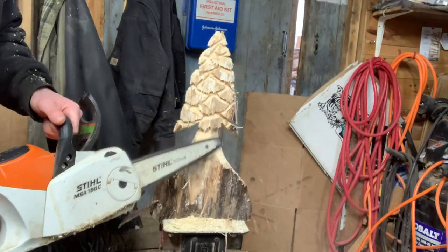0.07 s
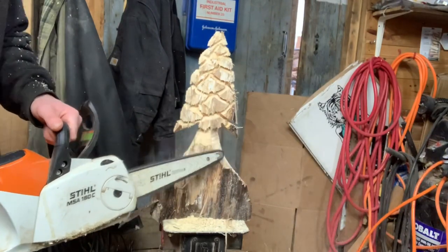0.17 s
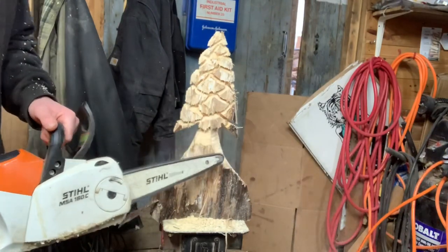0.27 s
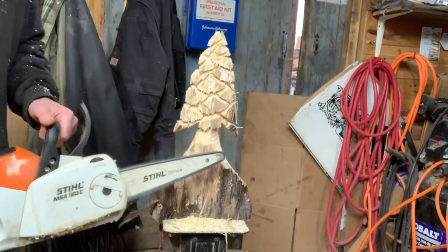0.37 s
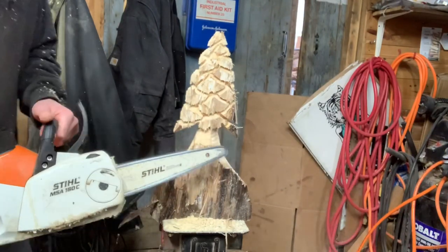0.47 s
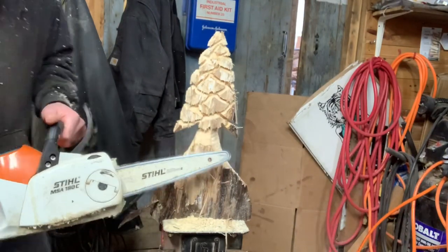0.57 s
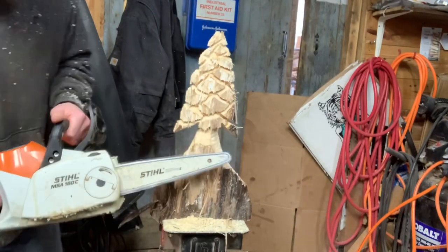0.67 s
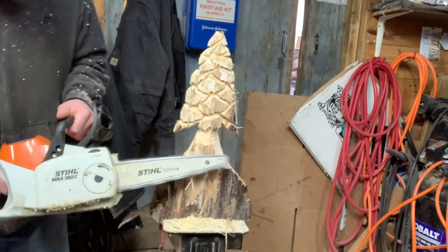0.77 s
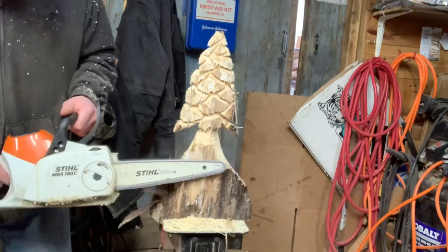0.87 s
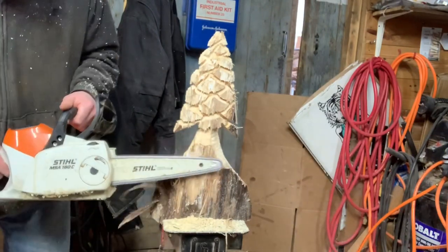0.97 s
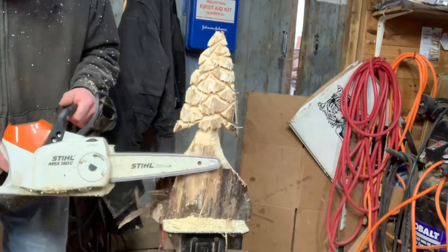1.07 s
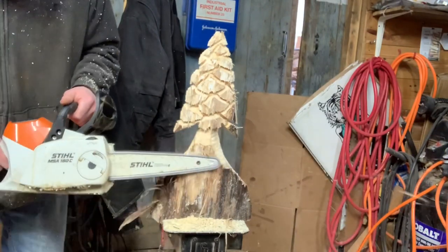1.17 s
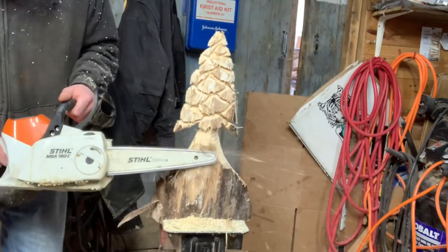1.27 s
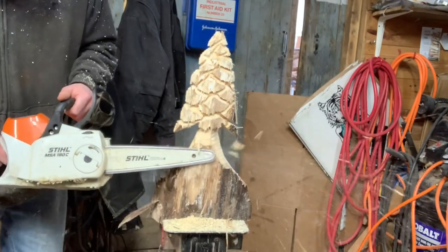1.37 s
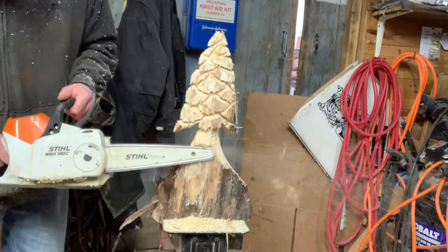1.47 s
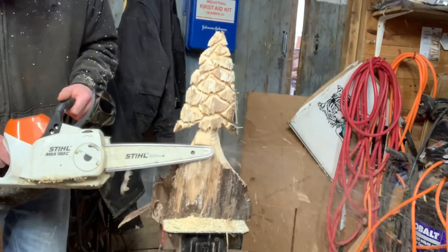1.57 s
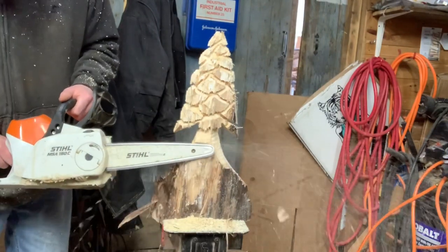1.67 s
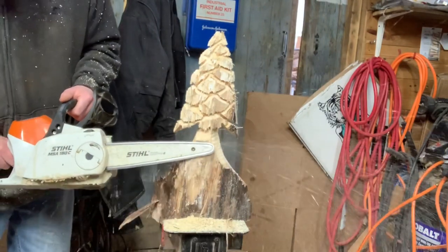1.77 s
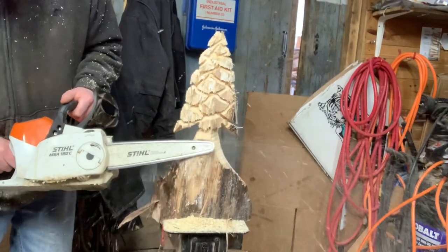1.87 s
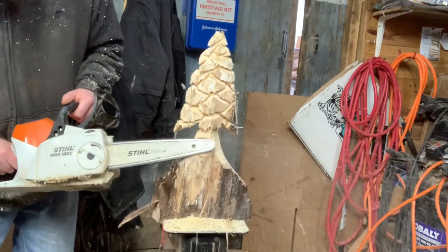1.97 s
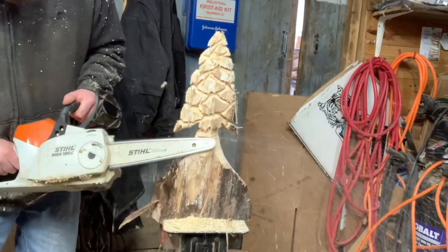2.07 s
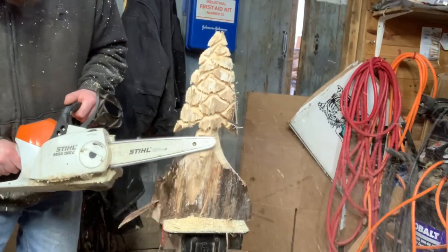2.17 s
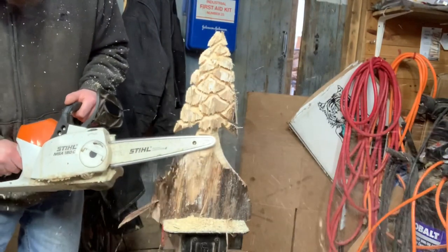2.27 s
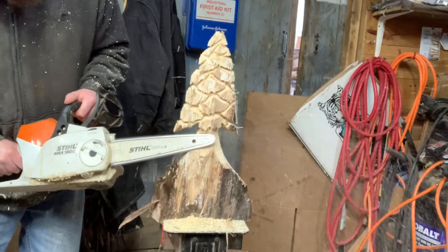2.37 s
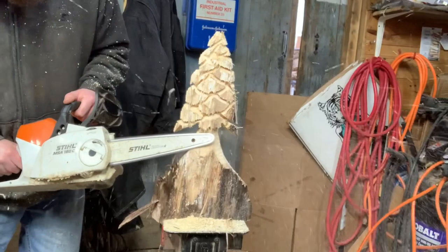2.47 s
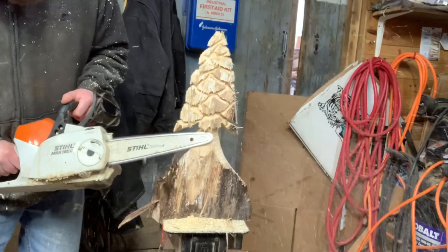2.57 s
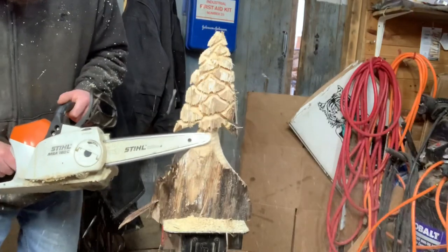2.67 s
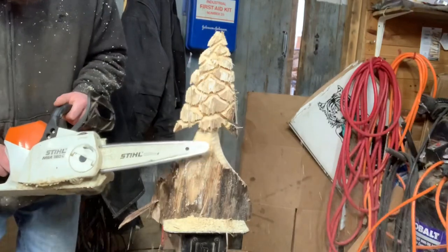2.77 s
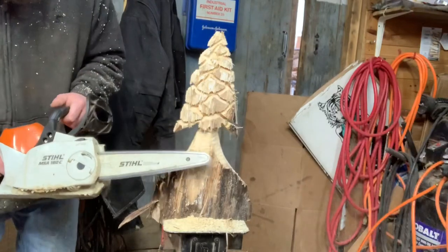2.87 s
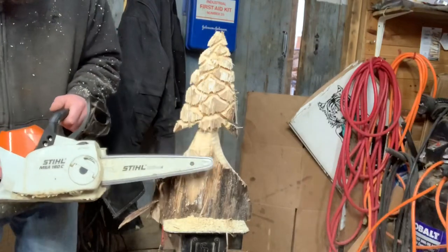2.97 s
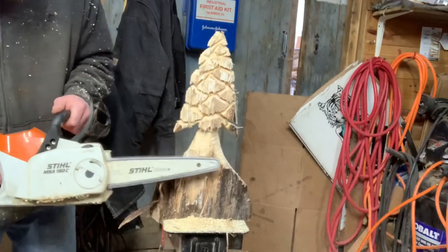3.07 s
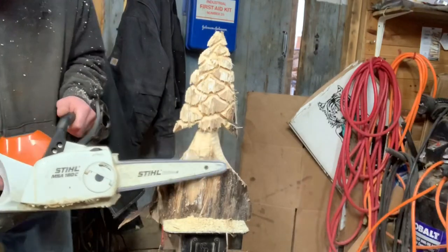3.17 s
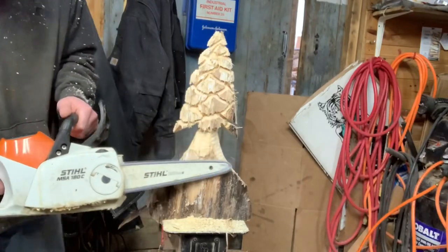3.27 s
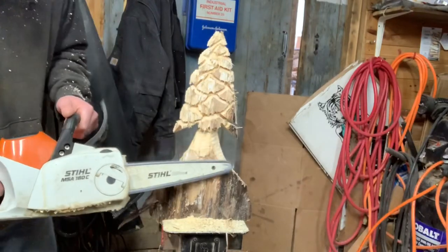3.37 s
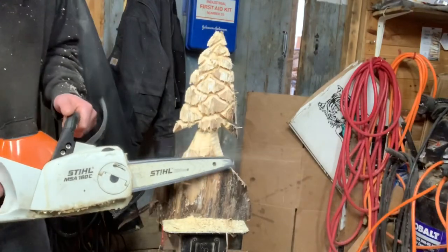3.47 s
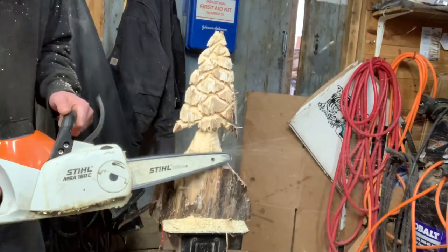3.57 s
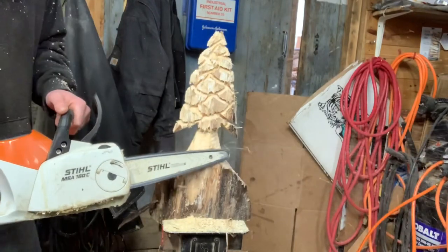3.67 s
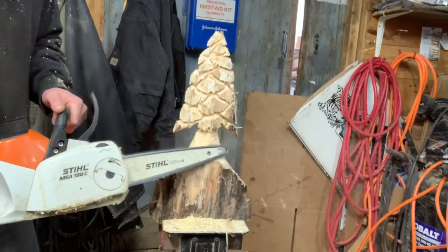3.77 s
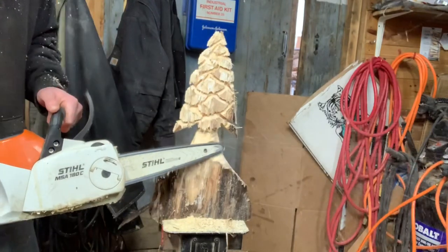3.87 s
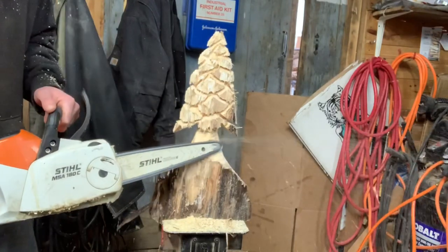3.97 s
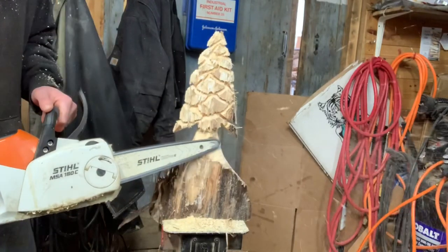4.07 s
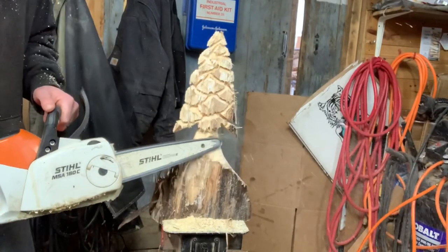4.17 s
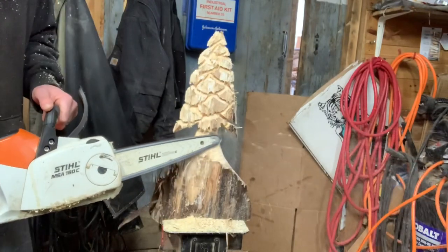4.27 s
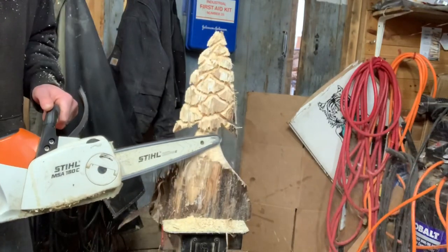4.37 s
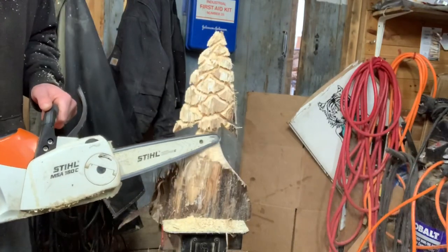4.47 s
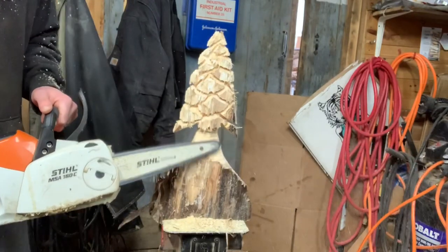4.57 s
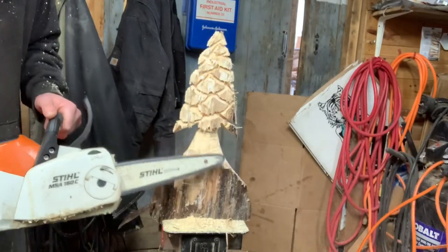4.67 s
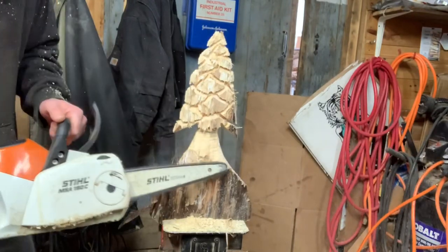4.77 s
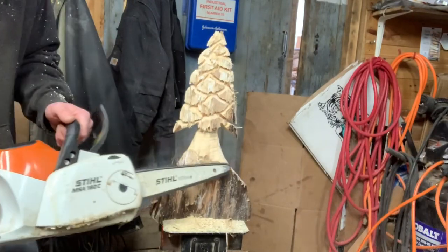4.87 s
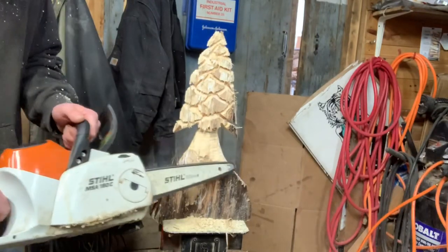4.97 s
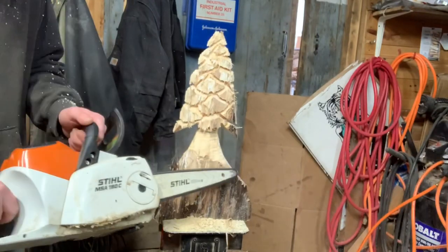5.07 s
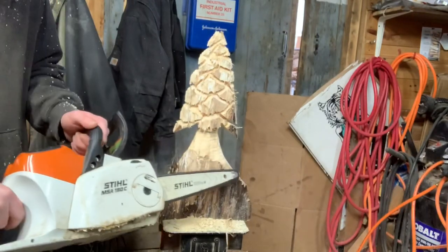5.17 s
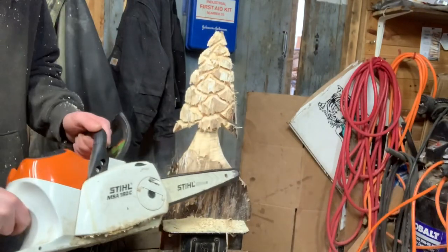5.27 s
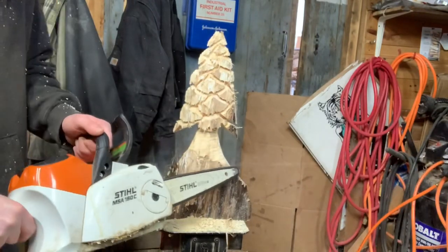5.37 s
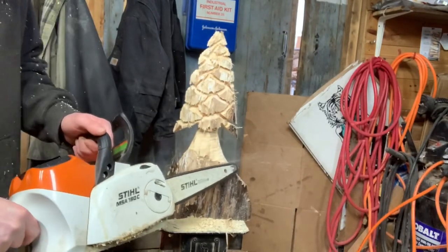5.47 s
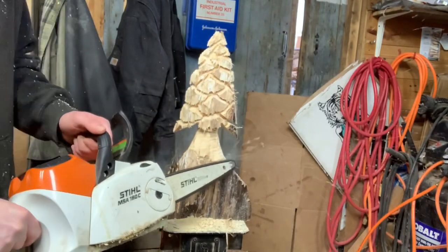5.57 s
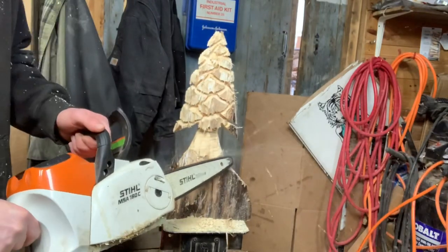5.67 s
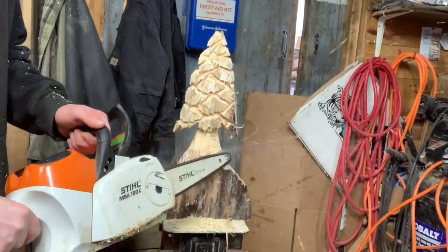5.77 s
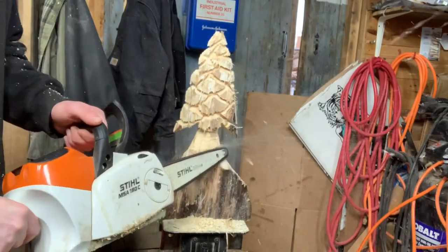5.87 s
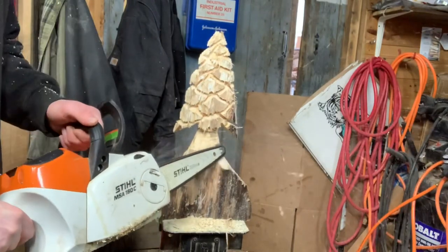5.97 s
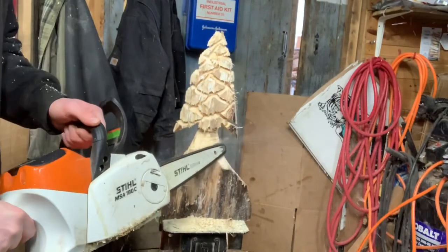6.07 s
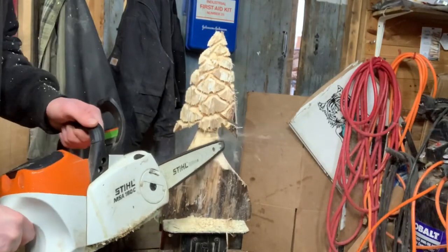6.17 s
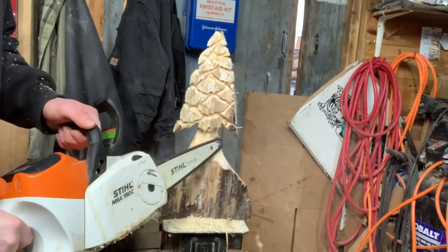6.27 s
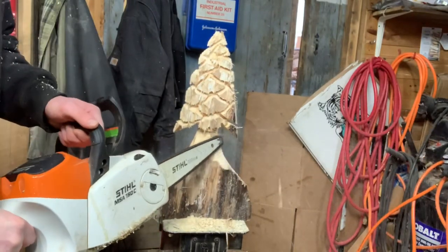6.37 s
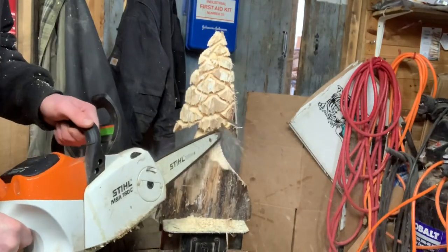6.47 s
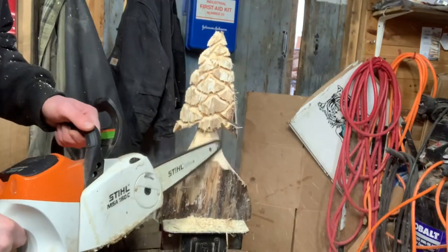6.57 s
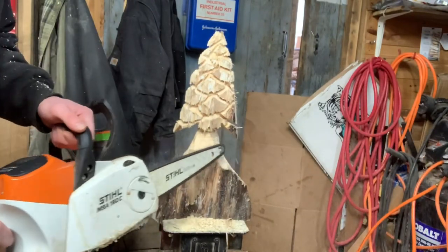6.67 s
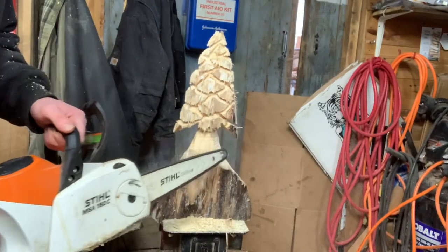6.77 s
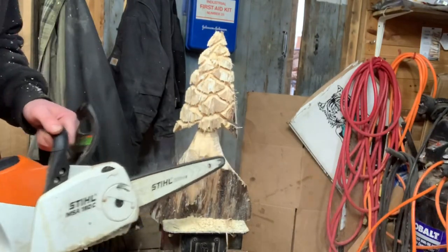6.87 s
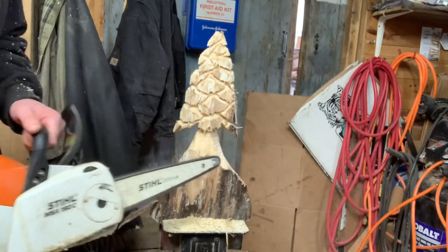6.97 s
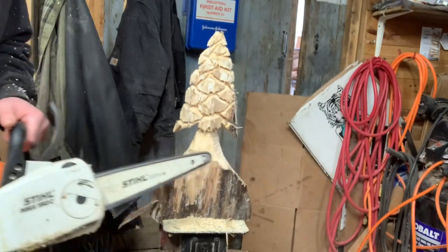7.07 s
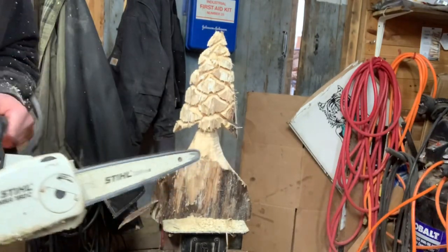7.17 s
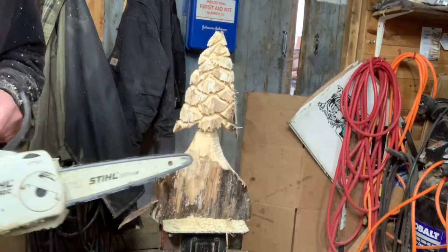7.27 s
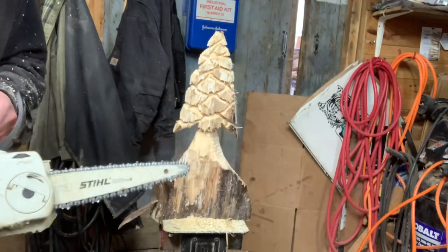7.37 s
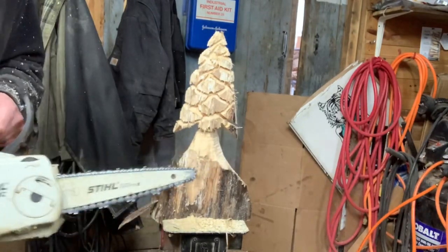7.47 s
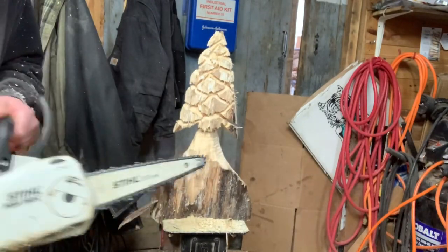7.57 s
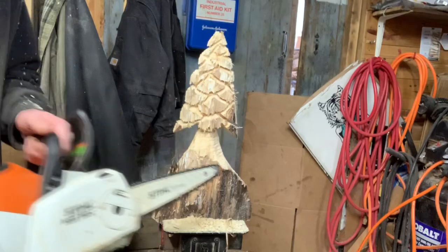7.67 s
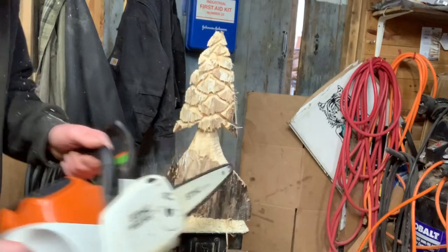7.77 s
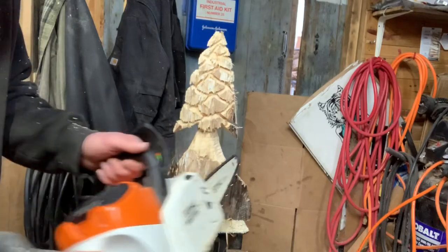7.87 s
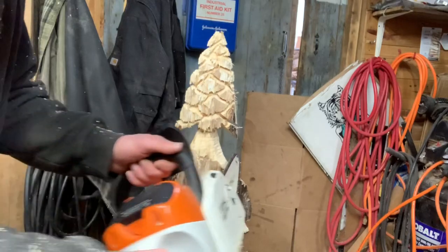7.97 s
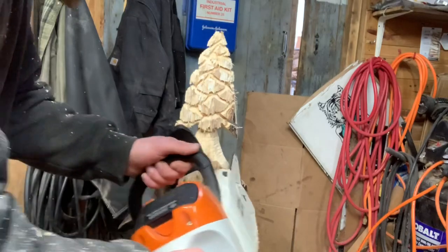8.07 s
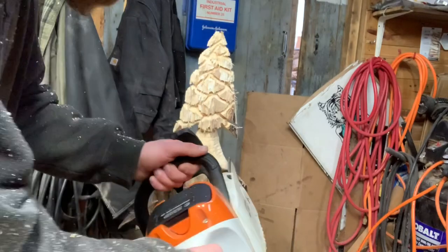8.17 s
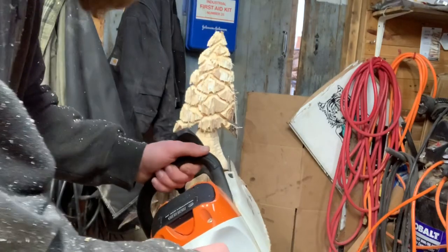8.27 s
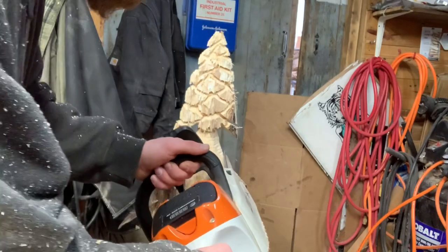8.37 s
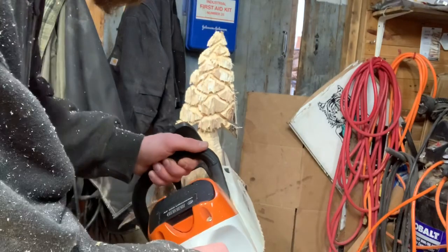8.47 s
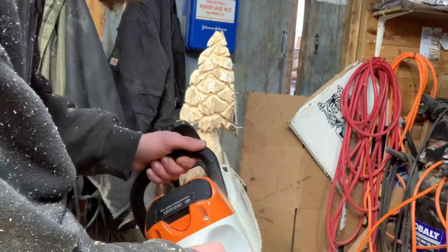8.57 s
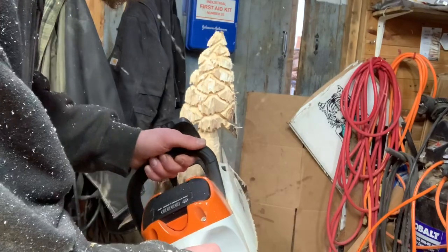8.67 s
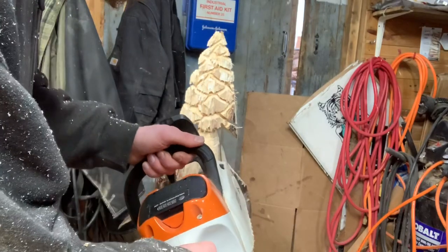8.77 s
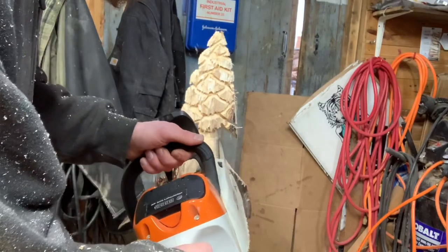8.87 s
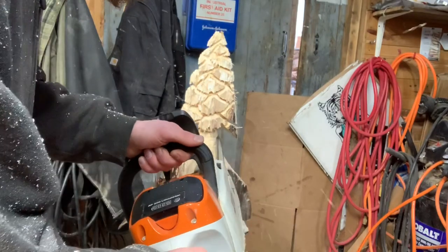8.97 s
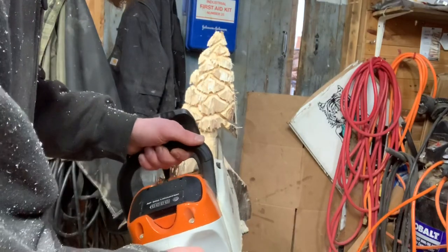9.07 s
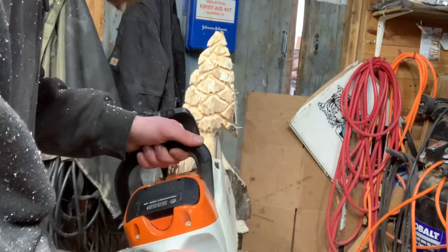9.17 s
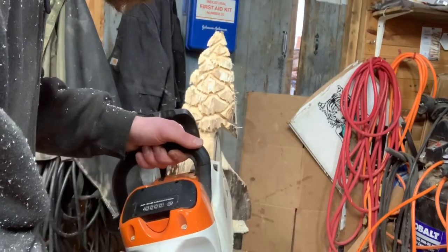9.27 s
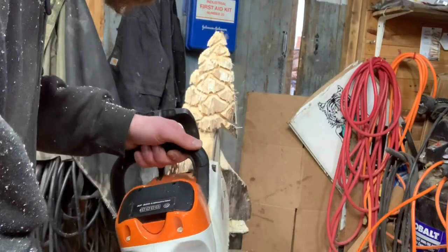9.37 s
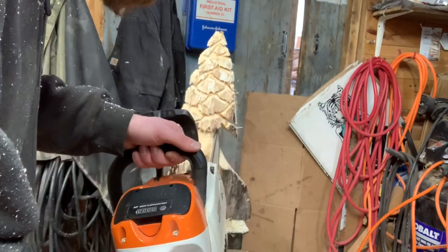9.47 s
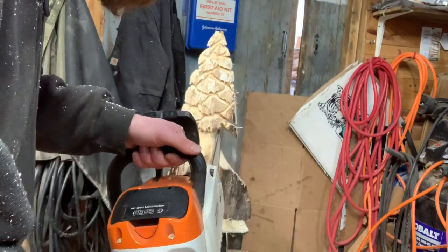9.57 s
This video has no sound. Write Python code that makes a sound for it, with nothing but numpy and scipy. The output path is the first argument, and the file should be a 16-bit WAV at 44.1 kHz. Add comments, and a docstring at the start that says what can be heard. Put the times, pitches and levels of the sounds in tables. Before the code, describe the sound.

Close to the microphone in a small workshop, a battery chainsaw rattles with a harsh bright hiss and steady whine. It slows into a hollow growl, spins back up, then pushes into wood in rough humming surges. It coasts down to quiet with small clicks and knocks, restarts with a rising whine and makes short, hard cuts. The loud sound is clipped and gritty.

```python
"""In a workshop, close to a microphone, a battery chainsaw carves a small wooden tree with its bar tip.
Links strike and ring the housing, scrape as bursts of hiss and make the bar squeal by friction.
Sinusoids locked to link and cutter rates whine and hum; pushes into the wood raise the level.
The saw coasts down, spins up, stops, is turned round and starts again, in a short room tail.
The microphone's input overloads: the waveform is clipped and its top cut."""
import sys
import numpy as np
from scipy import signal
from scipy.fft import rfft, irfft, next_fast_len
from scipy.io import wavfile
from scipy.ndimage import uniform_filter1d, map_coordinates

SR = 44100
rng = np.random.default_rng(int(sys.argv[2]) if len(sys.argv) > 2 else 0)


def unload_wav(signal):
    """Save mono or channel-first audio to the path in sys.argv[1] as 16-bit WAV at rate SR, clipped to [-1, 1]."""
    wavfile.write(
        sys.argv[1],
        SR,
        np.round(np.clip(np.atleast_2d(signal).T, -1, 1) * 32767).astype(np.int16),
    )


N = 423801
TIME = np.arange(N) / SR

# link rate before the load's sag; rest is a faint crawl: t/s, f/Hz
LINK_RATE = [(0, 1000), (.09, 985), (.2, 862), (.28, 758), (.44, 435), (.49, 365), (.57, 225), (.65, 365),
             (.8, 700), (.9, 875), (.99, 1011), (6.68, 1008), (6.8, 912), (6.9, 775), (7.08, 430),
             (7.125, 360), (7.235, 200), (7.285, 20), (7.938, 20), (7.972, 200), (8.19, 355), (8.29, 455),
             (8.34, 610), (8.44, 690), (8.53, 860), (8.62, 1016), (8.75, 1009)]
# pushes of the bar tip into the wood: start t/s, end t/s, force/0-1,
# tearing level/dB before the speed law and final trim, rise of link whine/dB
PUSHES = [(-.1, 0.201, 0.32, -70, -17), (.94, 1.074, 0.12, -70, 1.5), (1.081, 1.565, 0.54, -50.5, 7),
          (1.569, 1.992, 0.61, -43.5, 6), (2.019, 2.562, 0.51, -58, 2.5), (3.171, 3.451, 0.36, -63, 0.5),
          (3.449, 3.821, 0.83, -40.5, 4), (3.856, 4.019, 0.93, -36, 2.5), (4.095, 4.238, 1, -35, 1.5),
          (4.287, 4.492, 0.54, -66, 5), (4.548, 4.821, 0.16, -70, 6.5), (4.862, 5.419, 0.26, -68, 2.5),
          (5.44, 5.788, 0.74, -42.5, 6.5), (5.796, 5.987, 0.83, -36, 4.5), (6.041, 6.203, .8, -32, 8),
          (6.277, 6.49, 0.72, -36, 3), (6.541, 6.88, 0.16, -73, -9), (8.53, 8.71, 0.57, -40, 8),
          (8.74, 8.937, 0.8, -32, 11.5), (9.029, 9.18, 0.63, -32.5, 11), (9.276, 9.417, 0.76, -34, 3)]
PUSH_EASE_S = 0.1  # time to lean in and to let go
SAG_HZ = 17  # mean link rate lost at full force
CRAWL_HZ = 203  # below this link rate the chain fades towards silence
# level laws, rows from the side and from behind: level free at full speed/dB,
# rise at full force/dB, loss per halving of speed/dB
CLATTER_LAW = [(-32.5, 7.5, 3), (-29.5, 7.5, 6)]
HISS_LAW = [(-21.5, 6.56, 7), (-24, 6.1, 9.8)]
# how far the bar tip is raised: t/s, share/0-1
TIP_RAISED = [(0, 1), (.4, 0.9), (.8, 0), (2.9, 0.01), (3.4, 0.99), (5.2, 0.83), (5.9, 0.51), (6.6, 0.83)]
TURN_S = 7.7  # the saw is heard from the side before, from behind after

# broad spectrum of the clatter: f/Hz, level/dB
CLATTER_SPECTRUM = [(30, -40), (140, -29.5), (220, -9), (330, -3.5), (550, -3), (800, -4.5), (1100, 0.5),
                    (1600, 0), (2050, -5.5), (2350, -9.5), (2800, -4), (3600, -42.5), (6000, -36)]
# housing resonances from the side and from behind: f/Hz, width/Hz, level/dB
HOUSING_SIDE_MODES = [(752, 115, -0.5), (1559, 61, -0.5), (1720, 190, 1), (1840, 100, -8.5)]
HOUSING_REAR_MODES = [(253, 37, -2), (325, 70, -2.5), (400, 97, 2), (658, 80, -.5), (845, 45, 1.5),
                      (1030, 100, -2), (1350, 110, 5), (1425, 70, 9.5), (1505, 60, 0), (1845, 68, 3.5)]
LOOP_LINKS = 64  # drive links in one loop of chain
# spells of the ringing sprocket cover: start t/s, end t/s, level over the clatter/dB
COVER_SPELLS = [(-.1, .16, -4), (3.15, 4.5, -11), (4.55, 4.95, -4), (6.93, 7.12, -3.5)]
COVER_EASE_S = 0.11
# resonances of the cover: f/Hz, width/Hz, level/dB
COVER_MODES = [(1548, 70, -0.5), (1667, 83, 1), (1755, 68, -3), (1887, 80, -3), (2007, 60, -3.5)]
# spells of the housing's hollow note: start t/s, end t/s,
# level over the clatter/dB, before tip height and speed act
HOLLOW_SPELLS = [(.4, .78, -21), (.79, 2.6, -11.5), (2.58, 3.14, -18), (3.5, 4.6, -13.5)]
# fade; rise with the tip fully up; gain per halving of speed
HOLLOW_EASE_S, HOLLOW_RAISED_DB, HOLLOW_SLOWING_DB = 0.11, 2.5, 8.5
# resonances of the hollow note: f/Hz, width/Hz, level/dB
HOLLOW_MODES = [(368, 28, 0), (758, 110, -7)]

# spectra of the hiss, bar level, tip up and bar pointing away: f/Hz, level/dB
HISS_LEVEL_SPECTRUM = [(2000, -21.5), (3000, -12.5), (4800, -11), (5450, -4.5), (5800, -9), (6300, -0.5),
                       (6750, -6), (7500, -1.5), (8800, 2), (10000, 0), (11400, -0.5), (13000, -2.5),
                       (14500, -10.5), (15800, -8.5)]
HISS_RAISED_SPECTRUM = [(2000, -15.5), (3000, -9), (4900, -9.5), (5600, -5.5), (6900, -5), (7500, 0),
                        (8600, 0), (9100, 1.5), (10000, 1.5), (11400, 1.5), (12300, 0.5), (13300, 2),
                        (14100, -4.5), (15800, -10)]
HISS_AWAY_SPECTRUM = [(2000, -35), (2800, -11), (5200, -7), (6150, -2.5), (6900, -3.5), (8000, -1),
                      (8500, 1), (9400, 3.5), (11000, -1.5), (12000, 0), (13500, -4.5), (15800, -12)]

# spells of rubbing in the bar groove: start t/s, end t/s,
# level/dB before pressure, speed and flutter act
SQUEAL_SPELLS = [(-.2, .36, -18), (4.71, 7.25, -20)]
# fade; loss per halving of speed; rise at full side pressure
SQUEAL_EASE_S, SQUEAL_SLOWING_DB, SQUEAL_PRESS_DB = 0.27, 10, 3.5
# side pressure on the bar: t/s, share/0-1
SIDE_PRESSURE = [(5.1, 0), (5.55, 0.59), (5.9, 1), (6.5, 1), (6.8, 0.3), (7, 0.02)]
# bar resonances, free and pressed sideways: f/Hz, width/Hz, level/dB
BAR_FREE_MODES = [(9300, 290, 5), (9910, 360, 2.5), (10900, 380, -15.5)]
BAR_PRESSED_MODES = [(8850, 460, -1), (9290, 400, -0.53), (10110, 240, -1.4), (10640, 290, -0.88)]

MESH_DB = -40.5  # link whine, running free at full speed, before its partials' levels
# partials of the links: multiple of the link rate, level/dB
LINK_PARTIALS = [(1, -1.5), (2, -4.5), (3, -12)]
# turning of the seven-tooth sprocket: multiple of the link rate, level/dB
SPROCKET_PARTIALS = [(1 / 7, -54.5), (2 / 7, -51), (9 / 7, -48)]
# spells of whistling third link partial: start t/s, end t/s, level at full speed/dB
WHISTLE_SPELLS = [(2.76, 3.08, -44)]
WHISTLE_EASE_S = 0.15

# background of the quiet workshop, relative: f/Hz, level/dB
WORKSHOP_SPECTRUM = [(25, 11), (60, -8.5), (110, -9), (200, -20), (360, -19.5), (700, -26.5), (1600, -30),
                     (3000, -39), (9000, -36), (16000, -48.5)]

# run-downs and run-ups: start t/s, end t/s, low growl level/dB, high whistle level/dB
GLIDES = [(.19, .31, -2, 3.5), (.41, .54, 2, -3), (.62, .79, 1, -1), (.86, .96, -5, -2),
          (6.8, 7.03, -2, -1.5), (7.03, 7.2, 1.5, -1.5), (8.24, 8.56, 0, -9)]
GLIDE_EASE_S = .06
# partials of a chain changing speed: multiple of the link rate, level/dB
GLIDE_PARTIALS = [(1 / 2, -10), (1, 0), (2, -1), (3, -6), (4, -11)]
# low and high resonances swept through: f/Hz, level/dB
GLIDE_LOW_RESPONSE = [(180, -35), (270, -13), (330, -10), (368, 3), (400, -4), (440, -4), (490, -17),
                      (680, -16), (755, -6), (820, -22), (1300, -40)]
GLIDE_HIGH_RESPONSE = [(1000, -45), (1440, -10), (1540, 2), (1620, -1), (1730, 3), (1850, -7), (2100, -20),
                       (3000, -45)]

# spectrum of the wood as the cutters tear at it: f/Hz, level/dB
WOOD_SPECTRUM = [(50, -15), (110, -12), (300, -3), (550, 0.5), (850, -5.5), (1500, -6), (3000, -22.5)]
# cutter partials, left-right pair, single cutter, the pair's third: multiple of the link rate
CUTTER_PARTIALS = [1 / 4, 1 / 2, 3 / 4]
# cutters dig in and hum, before flutter and the speed law: start t/s, end t/s,
# pair level/dB, single cutter level/dB, third level/dB
BITES = [(1.08, 1.5, -51, -50, -44), (1.58, 2.0, -49, -45, -46), (2.05, 2.5, -54, -57, -48),
         (3.58, 3.84, -56, -40.5, -47), (3.85, 4.02, -56, -35.5, -38), (4.11, 4.27, -52, -36, -36.5),
         (5.55, 5.76, -56, -43, -51), (5.76, 5.95, -53, -38, -48), (6.02, 6.2, -52, -38, -48),
         (6.29, 6.48, -53, -34.5, -50), (8.63, 8.76, -39, -39, -44), (8.76, 8.93, -43, -27.5, -40),
         (9.04, 9.175, -44, -27.5, -39), (9.29, 9.415, -50, -30.5, -43)]
BITE_EASE_S = .06

# last rustle of the chain: start t/s, end t/s, level/dB
SETTLING_SPELLS = [(7.25, 7.57, -73.5)]
SETTLING_EASE_S = 0.13
# resonances rung by the rustle: f/Hz, width/Hz, level/dB
SETTLING_MODES = [(355, 70, 6), (750, 300, -6), (1500, 400, -12), (1980, 160, -10), (5200, 500, -9.5),
                  (8300, 1100, -12), (11500, 900, -18)]
# chain ticks, grip knocks and the jerk of take-up: t/s, onset level/dB,
# time to fall 60 dB/s, centre f/Hz, width/Hz
HANDLING_KNOCKS = [(7.271, -60, 0.16, 1197, 2483), (7.325, -66, 0.035, 8020, 3980),
                   (7.477, -69, .025, 6000, 7000), (7.503, -70, .025, 10000, 6000),
                   (7.615, -73, 0.25, 1400, 3490), (7.62, -76, .25, 8000, 8000),
                   (7.677, -56, 0.15, 220, 600), (7.698, -57, .09, 300, 600), (7.78, -73, .015, 5010, 6000),
                   (7.787, -65, 0.027, 2000, 4500), (7.958, -51, 0.06, 1198, 1498),
                   (7.967, -52, .05, 9000, 8000)]
# motor windings as the current comes on: f/Hz, width/Hz, level/dB
MOTOR_MODES = [(1695, 430, 5), (2987, 177, -13), (4260, 140, -11), (6700, 120, 0)]
MOTOR_ON_S = 7.935

TOP_HZ = 15750  # upper limit of the recorded band


def undb(db):
    """Logarithmic level: decibels to amplitude gain."""
    return 10 ** (np.asarray(db) / 20)


def unit(x):
    """Power normalisation: scale to rms 1."""
    return x / np.sqrt(np.mean(x ** 2))


def curves(table):
    """Linear interpolation: the columns of a table against time."""
    s, *columns = np.transpose(table)
    return [np.interp(TIME, s, column) for column in columns]


def filtered(x, response):
    """Linear filtering: multiply the spectrum by a response given over frequency, at rms 1."""
    size = next_fast_len(N + SR // 2, True)
    f = np.maximum(np.fft.rfftfreq(size, 1 / SR), 1)
    return unit(irfft(rfft(x, size) * response(f), size)[:N])


def colour(x, points):
    """Spectral shaping: a gain in dB drawn over log frequency."""
    hz, db = np.transpose(points)
    return filtered(x, lambda f: undb(np.interp(np.log(f), np.log(hz), db)))


def ring(x, modes):
    """Modal superposition: damped resonators driven in parallel."""
    def response(f):
        return sum(undb(db) / (1 + 1j * (f * f - hz * hz) / (f * width)) for hz, width, db in modes)
    return filtered(x, response)


def noise():
    """White noise: equal power at every frequency."""
    return rng.standard_normal(N)


def walk(rate):
    """Random modulation: smoothed steps drawn about `rate` times a second, at rms 1."""
    k = max(int(SR / rate), 2)
    steps = np.repeat(rng.standard_normal(N // k + 1), k)[:N]
    return unit(uniform_filter1d(steps, k))


def blend(a, b, share):
    """Power conservation: cross from one sound to another."""
    share = np.clip(share, 0, 1)
    return np.sqrt(1 - share) * a + np.sqrt(share) * b


def held(start_s, end_s, ease_s):
    """Gating envelope: sinusoidal rise centred on the start, hold at 1, fall centred on the end."""
    inside = np.minimum(TIME - start_s, end_s - TIME)
    return .5 + .5 * np.sin(np.pi * np.clip(inside / ease_s, -.5, .5))


def spells(table, ease_s):
    """Superposed gating: gain of a sound that comes and goes in held spells."""
    return sum(undb(db) * held(start, end, ease_s) for start, end, db in table)


def burst(start_s, decay_s):
    """Exponential decay: a sudden start that falls 60 dB in the decay time."""
    age = TIME - start_s
    return (age >= 0) * np.exp(-np.log(1000) * np.abs(age) / decay_s)


def slowing(hz):
    """Octave measure: halvings of the chain's speed below its maximum."""
    return np.log2(hz.max() / hz)


def drifting(x, share, rate):
    """Doppler-like resampling: an uneven time base lets resonances wander by a share of their pitch."""
    place = np.cumsum(1 + share * walk(rate))
    return map_coordinates(x, [place], order=3, mode="mirror")


def partials(links, orders):
    """Phase locking: sinusoids whose phase follows the travel of the chain."""
    return sum(np.sqrt(2) * undb(db) * np.sin(2 * np.pi * (k * links + rng.random())) for k, db in orders)


def impacts(links, hz, scatter_db, slow_scatter_db, decay_s):
    """Impulsive excitation: each link strikes with random force and decays; scatter varies with speed."""
    chance = rng.standard_normal(N // 20)[links.astype(int)]
    spread_db = scatter_db + slow_scatter_db * np.clip(1 - hz / hz.max(), 0, 1)
    age_s = (links % 1) / hz
    blows = undb(spread_db * chance) * np.exp(-age_s / decay_s)
    # hold the local power even
    return blows / np.sqrt(uniform_filter1d(blows ** 2, size=5000) + 1e-9)


def pushing():
    """Loading: each push gives force on the chain, bite of the cutters and a rise of the link whine."""
    force, bite, mesh_db = 0, 0, MESH_DB
    for start, end, strength, bite_db, rise_db in PUSHES:
        lean = held(start, end, PUSH_EASE_S)
        force = force + strength * lean
        bite = bite + undb(bite_db) * lean
        mesh_db = mesh_db + rise_db * lean
    return force, bite, mesh_db


def chain_rate(force):
    """Motor loading: the link rate sags in proportion to force and flutters at random."""
    asked, = curves(LINK_RATE)
    sag = SAG_HZ * force * (1 + .3 * walk(9))
    return np.maximum(asked - sag, 1) * (1 + 0.000983 * walk(15))


def loudness(law, force, hz):
    """Power-law radiation: level in dB rises with force and speed and fades at a crawl."""
    side, rear = (free_db + force_db * force - slow_db * slowing(hz) for free_db, force_db, slow_db in law)
    return np.where(TIME > TURN_S, rear, side) + 40 * np.log10(np.minimum(hz / CRAWL_HZ, 1))


def looped(links, repeat):
    """Periodicity: worn links return on every loop, so a share of the rattle repeats with the chain."""
    pairs = rng.standard_normal((LOOP_LINKS // 2, 32))
    # wear is how each pair of links departs from the average pair
    marks = (pairs - pairs.mean(axis=0)).ravel()
    places = np.linspace(0, LOOP_LINKS, len(marks), endpoint=False)
    worn = np.interp(links % LOOP_LINKS, places, marks)
    band = [(3000, 2.5), (7000, -6.0)]
    return blend(colour(noise(), band), colour(worn, band), repeat)


def cover(blows):
    """Forced resonance: in spells the chain slaps the sprocket cover, which rings in narrow notes."""
    slaps = blows * noise() * undb(2.7 * walk(45))
    return ring(ring(slaps, COVER_MODES), COVER_MODES) * spells(COVER_SPELLS, COVER_EASE_S)


def clatter(links, hz, clatter_db):
    """Impact excitation: links knock on sprocket and bar nose and ring the plastic housing."""
    blows = impacts(links, hz, scatter_db=2.5, slow_scatter_db=-2.0, decay_s=0.0015)
    blows = blows * undb(1.5 * np.tanh(walk(70)))
    knocks = blows * looped(links, repeat=0.22)
    rings = blows * looped(links, repeat=0.32)
    side_housing = ring(rings, HOUSING_SIDE_MODES)
    rear_housing = drifting(ring(rings, HOUSING_REAR_MODES), share=.012, rate=14)
    side = colour(knocks, CLATTER_SPECTRUM) + undb(-0.5) * side_housing
    rear = colour(knocks, CLATTER_SPECTRUM) + undb(3.0) * rear_housing
    body = blend(unit(side), unit(rear), TIME > TURN_S)
    return (body + hollow(hz) + cover(blows)) * undb(clatter_db)


def softened(x, hz):
    """Low-pass behaviour: a slow chain knocks more softly and loses the top of its clatter."""
    dull = signal.sosfiltfilt(signal.butter(6, 2150, fs=SR, output="sos"), x)
    return dull + (x - dull) * (hz / hz.max()) ** 0.52


def hiss(links, hz):
    """Sliding friction: steel scrapes on steel at every link; the spectrum turns with the bar."""
    scrape = impacts(links, hz, scatter_db=1.5, slow_scatter_db=-0.5, decay_s=0.0047)
    scrape = scrape * undb(.5 * walk(40))
    raised, = curves(TIP_RAISED)
    level_bar = colour(scrape * noise(), HISS_LEVEL_SPECTRUM)
    raised_bar = colour(scrape * noise(), HISS_RAISED_SPECTRUM)
    away = colour(scrape * noise(), HISS_AWAY_SPECTRUM)
    return blend(blend(level_bar, raised_bar, raised), away, TIME > TURN_S)


def glance(x, lag_s, sway, share):
    """Comb interference: a near reflection off the wood, its delay shifting as the hands move."""
    lag = lag_s * (1 + sway * walk(1.5))
    fine = signal.resample_poly(x, 4, 1)  # finer grid for the moving delay
    fine_time = np.linspace(0, N / SR, len(fine), endpoint=False)
    return unit(x + share * np.interp(TIME - lag, fine_time, fine))


def squeal(hz):
    """Friction-driven resonance: the groove rings the bar; side pressure strengthens and shifts it."""
    press, = curves(SIDE_PRESSURE)
    bar = blend(ring(noise(), BAR_FREE_MODES), ring(noise(), BAR_PRESSED_MODES), press)
    wandering = drifting(bar, share=.007, rate=5)
    radiated = colour(wandering, [(4000, -25.0), (8500, 2.0), (11200, 9.0), (15000, -20.5)])
    effort_db = SQUEAL_PRESS_DB * press - SQUEAL_SLOWING_DB * slowing(hz)
    return radiated * spells(SQUEAL_SPELLS, SQUEAL_EASE_S) * undb(effort_db + 0.88 * walk(90))


def whine(links, hz, mesh_db):
    """Harmonic meshing: link and sprocket partials, and a whistling third, fade as the chain slows."""
    mesh = partials(links + .02 * walk(60), LINK_PARTIALS) * undb(mesh_db + 2 * walk(25))
    whistle = partials(links, [(3, 0)]) * spells(WHISTLE_SPELLS, WHISTLE_EASE_S)
    turn = partials(links + 0.16 * walk(12), SPROCKET_PARTIALS) * undb(2.3 * walk(6.9))
    return (mesh + whistle + turn) * (hz / hz.max()) ** 7


def workshop(x, t60_s, wet_db):
    """Reverberation: convolution with decaying noise gives a small cluttered room's short, dull tail."""
    tail = colour(noise(), [(200, -5.5), (2000, -2.0), (12000, -10.0)]) * burst(0.0034, t60_s)
    tail = tail[:SR] / np.sqrt(np.sum(tail ** 2))
    return x + undb(wet_db) * signal.fftconvolve(x, tail)[:N]


def glide(links, hz, clatter_db):
    """Swept resonance: off full speed, unsteady link partials flare as they cross housing resonances."""
    low = spells([(start, end, db) for start, end, db, _ in GLIDES], GLIDE_EASE_S)
    high = spells([(start, end, db) for start, end, _, db in GLIDES], GLIDE_EASE_S)
    sweep = 0
    for k, db in GLIDE_PARTIALS:
        growl = undb(np.interp(k * hz, *np.transpose(GLIDE_LOW_RESPONSE)))
        whistle = undb(np.interp(k * hz, *np.transpose(GLIDE_HIGH_RESPONSE)))
        rough = partials(links + .11 / k * walk(80), [(k, db)]) * unit(undb(3 * walk(60)))
        sweep = sweep + rough * (low * growl + high * whistle)
    return sweep * undb(clatter_db)


def hollow(hz):
    """Cavity-like resonance: noise rings the housing's hollow note, stronger tip-up and at low speed."""
    raised, = curves(TIP_RAISED)
    gain_db = HOLLOW_RAISED_DB * raised + HOLLOW_SLOWING_DB * slowing(hz)
    note = ring(ring(noise(), HOLLOW_MODES), HOLLOW_MODES)
    return note * spells(HOLLOW_SPELLS, HOLLOW_EASE_S) * undb(gain_db)


def cutting(links, hz, bite):
    """Periodic chip removal: every second link cuts, left and right in turn, humming and tearing chips."""
    travel = links + .11 * walk(50)
    hum = 0
    for column, k in enumerate(CUTTER_PARTIALS):
        depth = spells([(start, end, dbs[column]) for start, end, *dbs in BITES], BITE_EASE_S)
        hum = hum + partials(travel, [(k, 0)]) * depth * undb(2 * walk(40))
    tears = impacts(links / 2, hz / 2, scatter_db=6.5, slow_scatter_db=2.5, decay_s=0.0017)
    tears = tears * undb(2 * walk(60))
    chips = colour(tears * noise(), WOOD_SPECTRUM)
    # a slow chain hardly cuts
    return (hum + undb(1.0) * chips * bite) * (hz / hz.max()) ** 3


def settling():
    """Random excitation: as the drive stops, the chain rustles faintly and unevenly on the ringing bar."""
    rustle = noise() * undb(2.1 * walk(70))
    return ring(rustle, SETTLING_MODES) * spells(SETTLING_SPELLS, SETTLING_EASE_S)


def handling():
    """Transient excitation: decaying noise for chain and grip, then the motor's resonant onset."""
    knocks = 0
    for s, db, decay, hz, width in HANDLING_KNOCKS:
        band = [(hz, width, 0)]
        knocks = knocks + undb(db) * burst(s, decay) * ring(ring(noise(), band), band)
    motor = colour(ring(noise(), MOTOR_MODES), [(7000, 0), (9000, -14)])
    return knocks + undb(-57) * burst(MOTOR_ON_S, 0.34) * motor


def scene():
    """Superposition: noises with room tail, direct tones and background, alike in both channels."""
    force, bite, mesh_db = pushing()
    hz = chain_rate(force)
    links = np.cumsum(hz) / SR  # travel of the chain, counted in links
    clatter_db = loudness(CLATTER_LAW, force, hz)
    hiss_db = loudness(HISS_LAW, force, hz)
    knocking = softened(clatter(links, hz, clatter_db), hz)
    scrape = glance(hiss(links, hz), lag_s=.0021, sway=0.027, share=0.25) * undb(hiss_db)
    rattle = knocking + scrape + squeal(hz) + handling() + settling()
    tones = whine(links, hz, mesh_db) + glide(links, hz, clatter_db) + cutting(links, hz, bite)
    background = undb(-59.0) * colour(noise(), WORKSHOP_SPECTRUM)
    air = workshop(rattle, t60_s=0.22, wet_db=-11.5) + tones + background
    return np.array([air, air])


def record(dry):
    """Nonlinear distortion: the input clips, adding a rough rumble below the hiss; then the top is cut."""
    ceiling = 0.13
    fine = signal.resample_poly(dry, 4, 1, axis=1)  # oversampling limits aliasing
    flat = np.clip(fine, -ceiling, ceiling)
    back = signal.resample_poly(flat, 1, 4, axis=1)
    steep = signal.firwin(401, TOP_HZ, fs=SR)
    return signal.fftconvolve(back, steep[None], mode="same", axes=1)


dry = scene()
out = record(dry)
unload_wav(out)
```